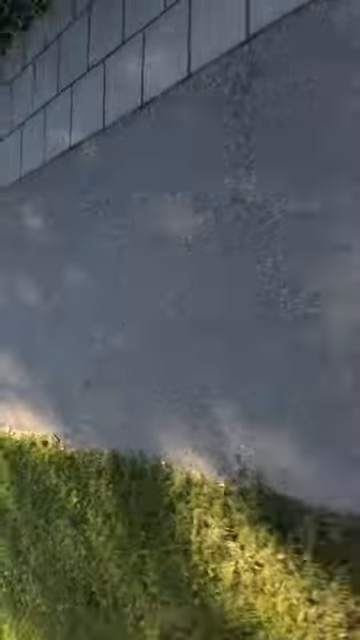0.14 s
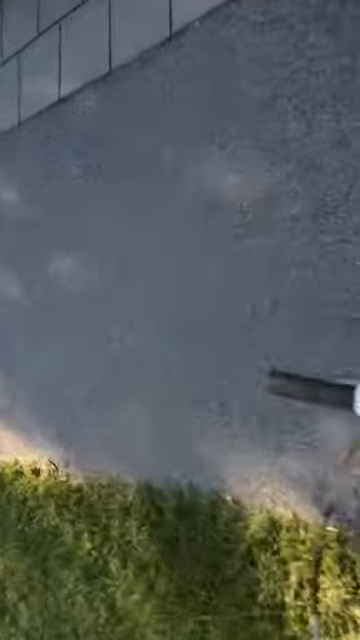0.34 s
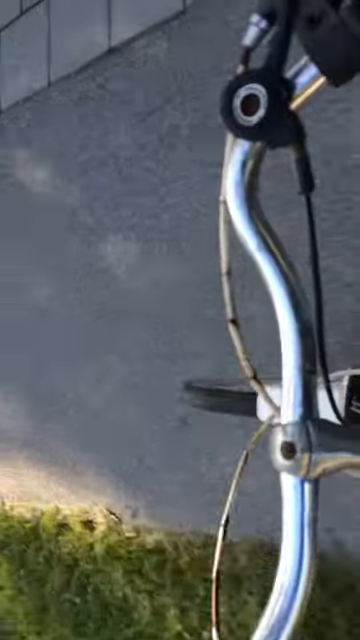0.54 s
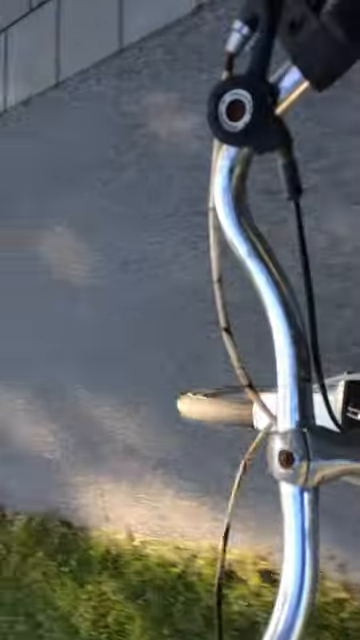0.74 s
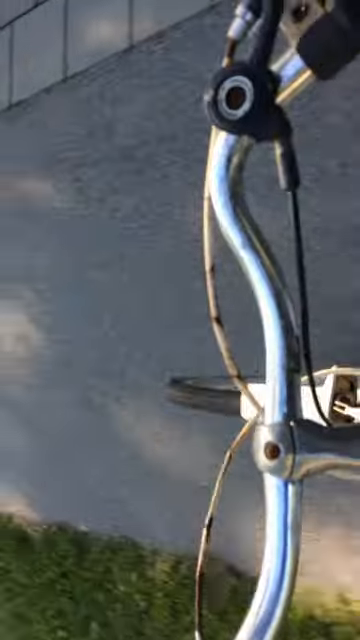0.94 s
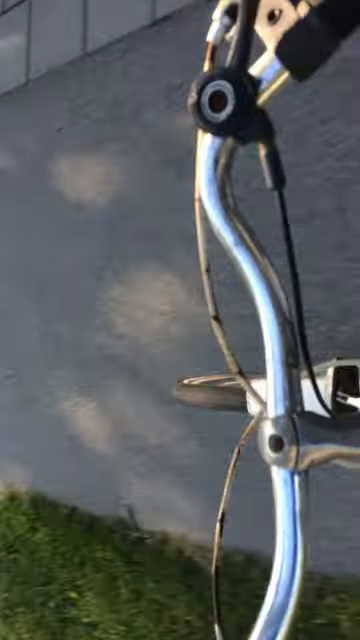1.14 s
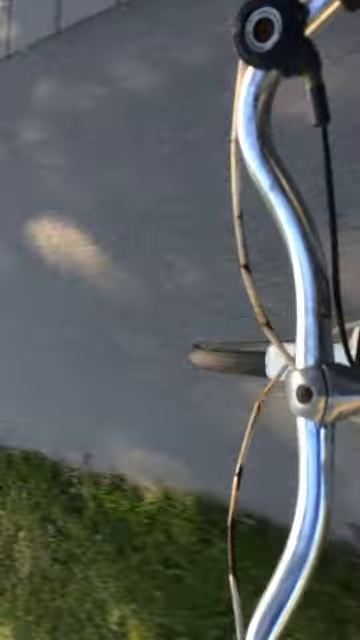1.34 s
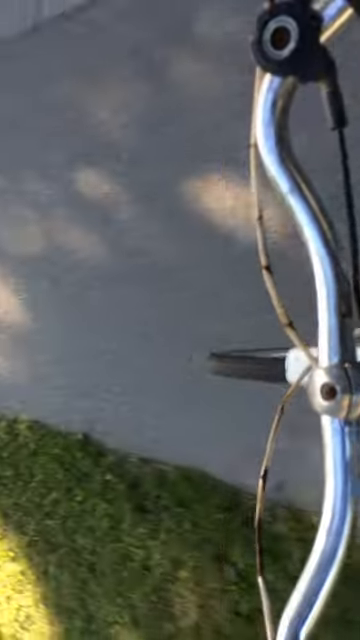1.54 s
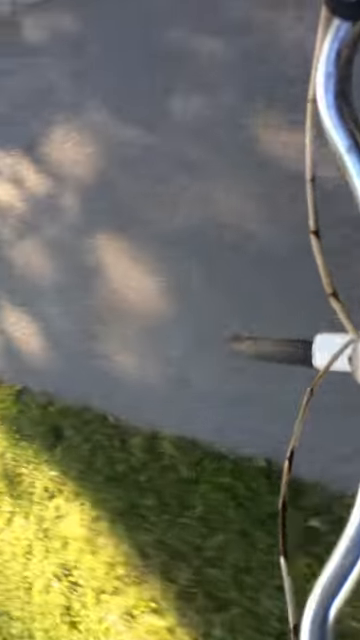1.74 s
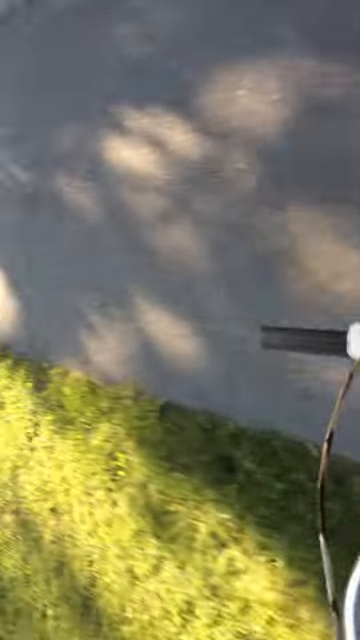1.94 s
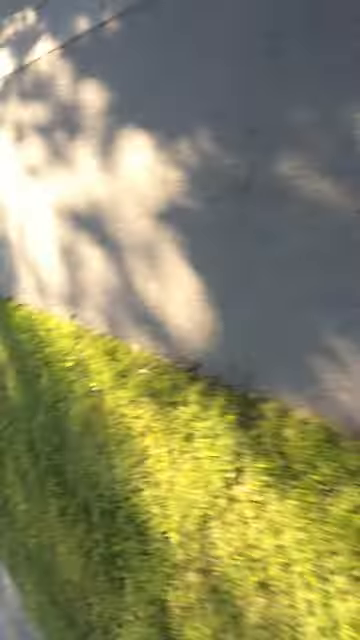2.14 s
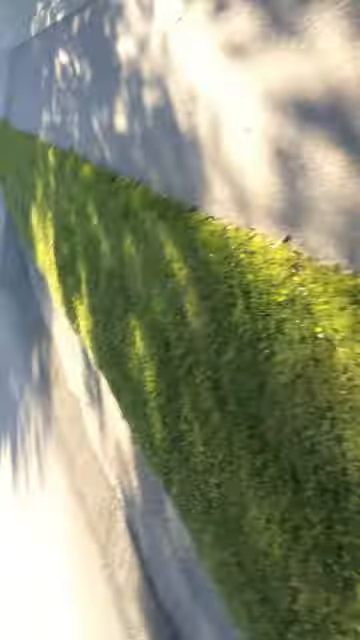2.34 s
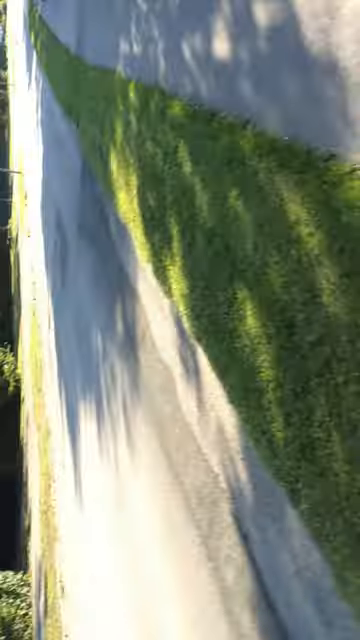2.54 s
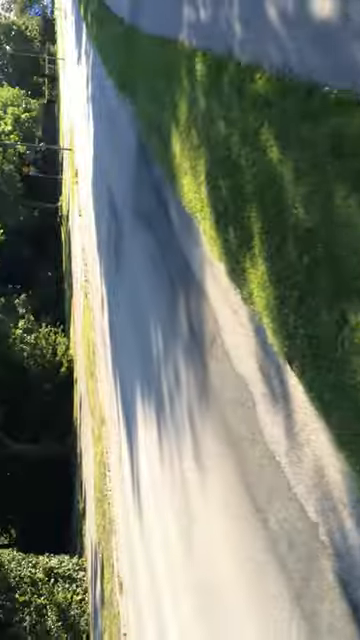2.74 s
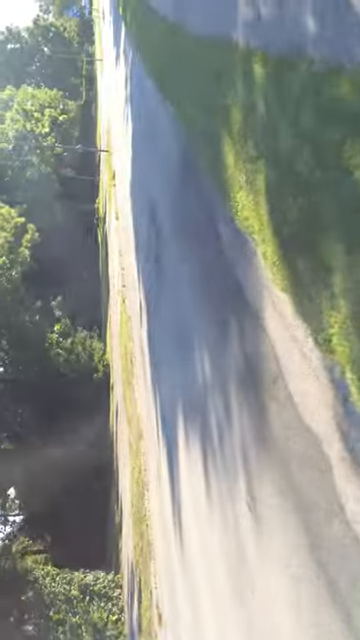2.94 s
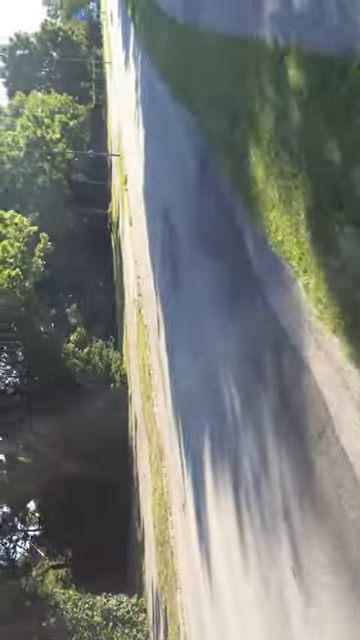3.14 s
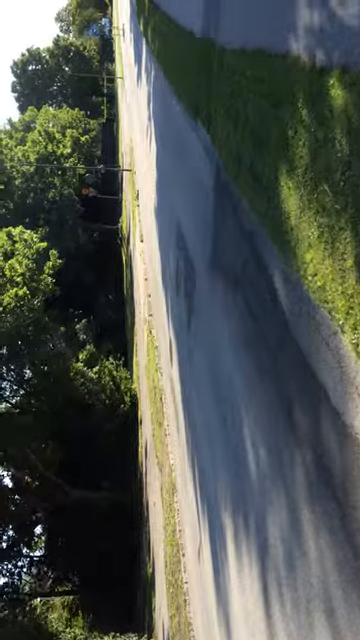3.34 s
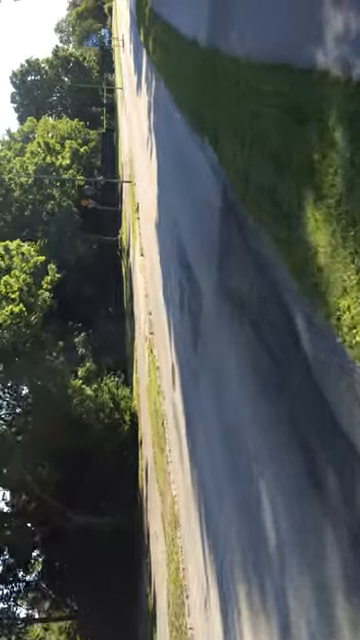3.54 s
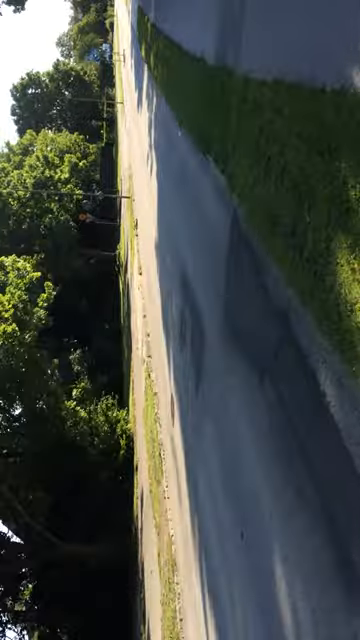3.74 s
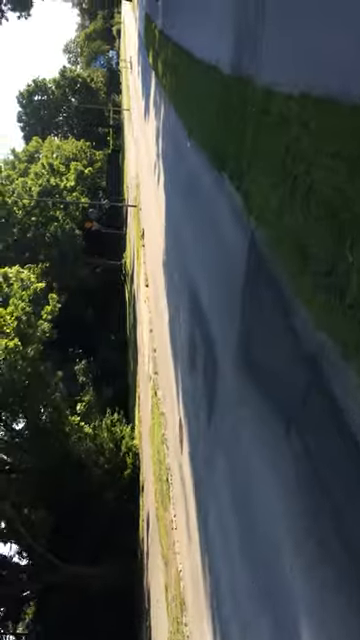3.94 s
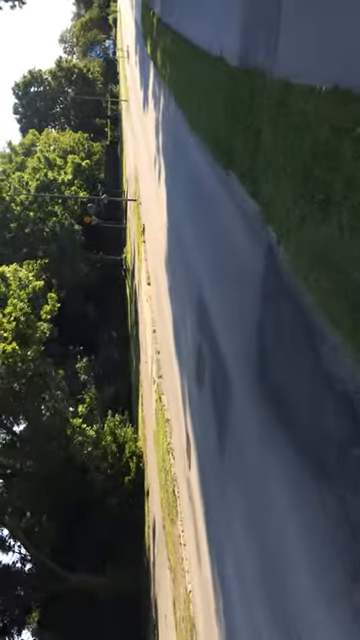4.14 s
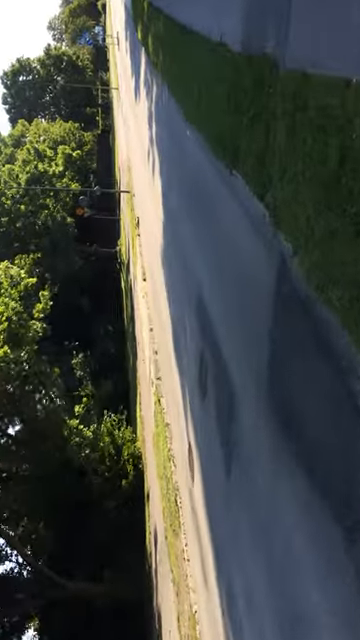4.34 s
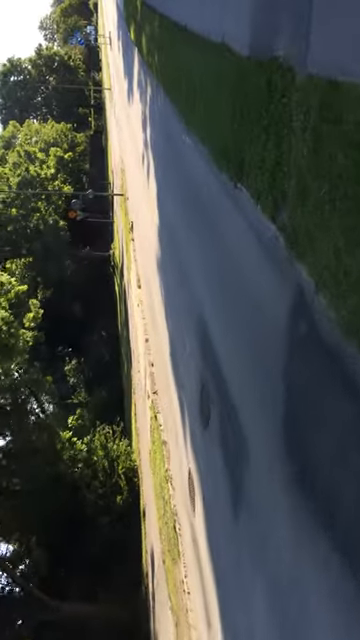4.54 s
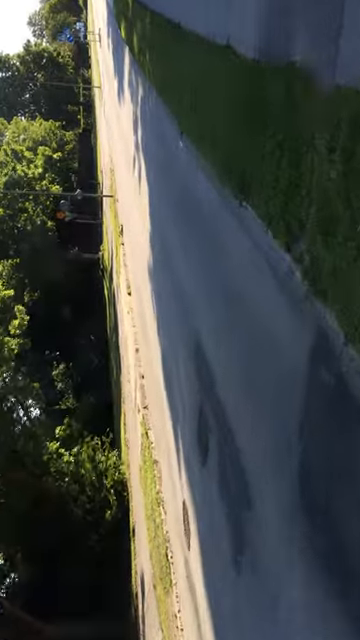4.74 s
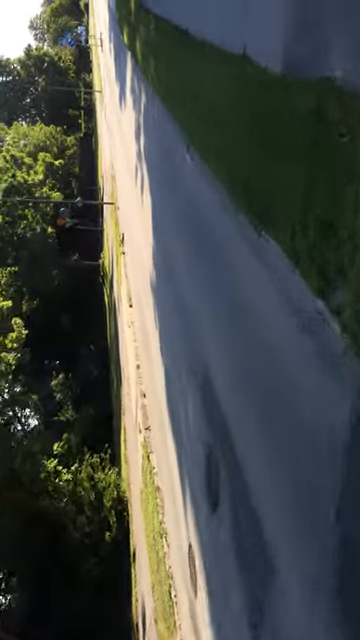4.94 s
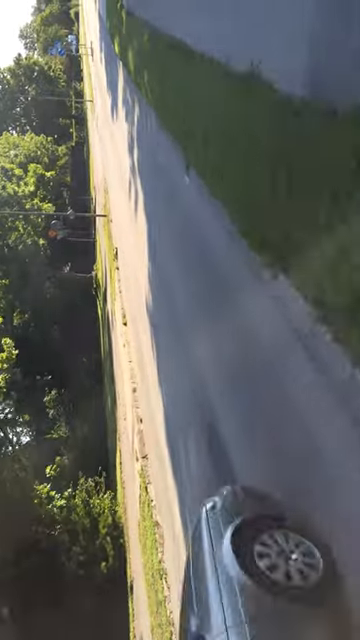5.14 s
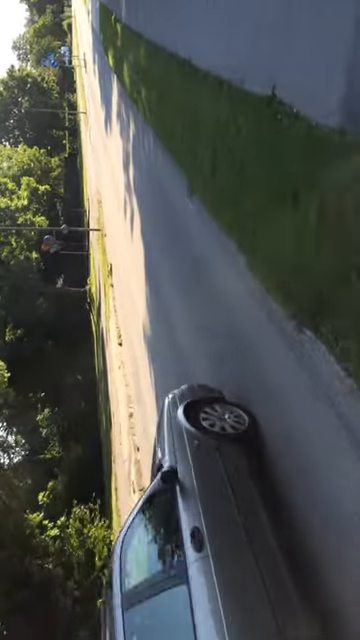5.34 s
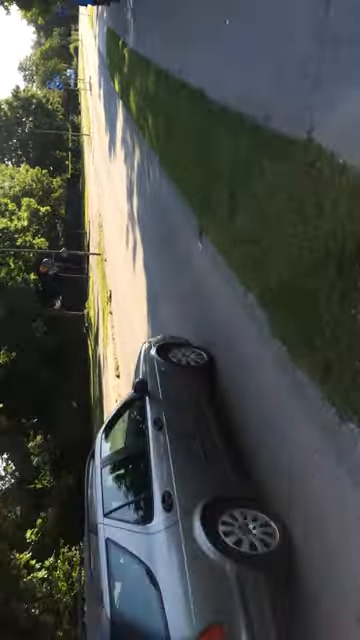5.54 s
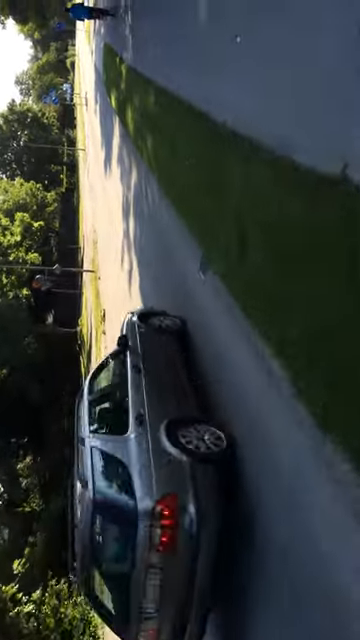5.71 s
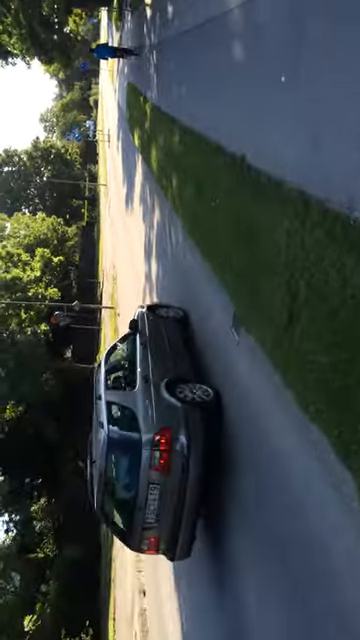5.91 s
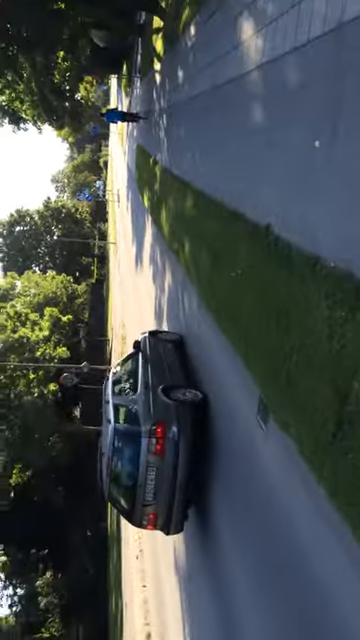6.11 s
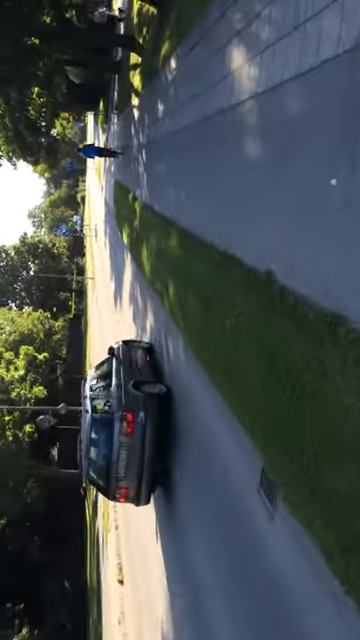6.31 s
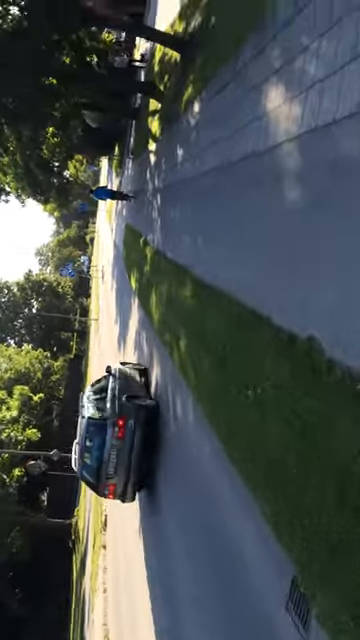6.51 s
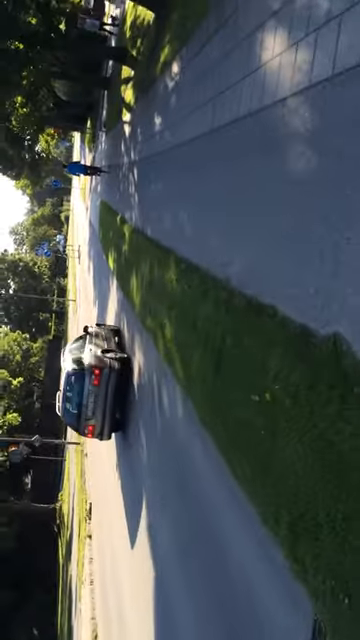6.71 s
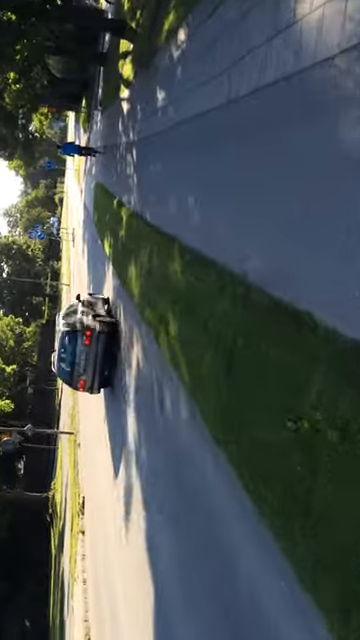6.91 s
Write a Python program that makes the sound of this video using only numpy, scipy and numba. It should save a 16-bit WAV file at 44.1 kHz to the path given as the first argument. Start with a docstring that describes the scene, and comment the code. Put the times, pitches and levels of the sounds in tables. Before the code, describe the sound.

Handheld on a moving bicycle: a metallic clank, soft rolling, one sharp loud snap, then a car roars past as loose metal rattles.

```python
"""A path beside a road: a car comes up from behind and overtakes a cyclist who holds a phone.
Car: shaped noise for tyre roar, hiss and body boom; a part tonal, part noisy hum for the exhaust.
Bicycle: rolling noise with tyre resonances, hissing bursts, a modal clank with rebounds, a rattle.
Hand: riding wind as low noise, dull thumps, light ticks and one loud snap of the phone's case."""
import sys
import numpy as np
from scipy import signal
from scipy.fft import rfft, irfft, next_fast_len
from scipy.io import wavfile
from scipy.ndimage import uniform_filter1d
from numba import njit

SR = 44100
rng = np.random.default_rng(int(sys.argv[2]) if len(sys.argv) > 2 else 0)


def unload_wav(signal):
    """Save mono or channel-first audio to the path in sys.argv[1] as 16-bit WAV at rate SR, clipped to [-1, 1]."""
    wavfile.write(
        sys.argv[1],
        SR,
        np.round(np.clip(np.atleast_2d(signal).T, -1, 1) * 32767).astype(np.int16),
    )


def invert_db(x):
    """Field ratio 10**(x/20) for x, a level in decibels (scalar or array-like)."""
    u = np.asarray(x, float) / 20
    return 10 ** u


N = 307377
T = np.arange(N) / SR  # s

# car: [t/s, tyre roar level/dB, tyre hiss level/dB, body boom level/dB]; roar and hiss before fade-in
CAR_LEVELS = [(1.6, -44, -62, -53), (2.2, -50.5, -62, -48), (2.7, -51, -59.5, -51),
              (3.3, -50.5, -62.5, -45), (3.7, -47, -59, -44), (4.03, -42.5, -57, -44),
              (4.24, -38, -56, -42), (4.46, -36.5, -54.5, -38.5), (4.65, -36.5, -49.5, -38),
              (4.88, -35.5, -43.5, -38), (5.2, -34.5, -46, -36), (5.4, -35.5, -46, -34.5),
              (5.65, -34.5, -47, -36.5), (5.9, -34.5, -47, -41.5), (6.07, -36.5, -50.5, -42.5),
              (6.36, -38, -53, -44.5), (6.6, -40, -53, -45.5), (6.97, -40.5, -56, -46)]
# relative noise spectra radiated ahead of and behind the car: [f/Hz, level/dB per Hz]
AHEAD_SPECTRUM = [(180, -5), (300, -13), (431, -3), (542, -5), (683, -1), (903, -2), (1140, -4),
                  (1720, -5.5), (2720, -16), (5800, -23.5), (8460, -18.5), (15300, -22)]
BEHIND_SPECTRUM = [(180, -42), (300, -32), (326, -61), (365, -5), (717, -6), (997, -2), (1320, -3),
                   (1500, -4), (1770, -5.5), (3660, -18), (4840, -20), (15300, -26)]
# passing of the car's front and back: [t/s, t/s]
TURN_S = (5.01, 5.86)
# exhaust hum, before wander: [t/s, f/Hz, level/dB]
EXHAUST_HUM = [(1.5, 146.3, -72), (1.8, 146, -53), (2.0, 150, -46), (2.15, 148, -54), (2.35, 140, -52),
               (2.7, 138, -53), (3.0, 141, -49), (3.12, 144, -46.5), (3.3, 146, -47), (3.5, 146, -43),
               (3.72, 148, -46), (3.85, 148, -60), (4.15, 147, -44.5), (4.3, 146, -46), (4.46, 162.7, -41),
               (4.6, 172, -43.5), (5.0, 178.8, -44), (5.35, 177, -53), (5.56, 177.6, -41),
               (5.77, 170, -36.5), (5.95, 170, -45.5), (6.3, 168.6, -53), (6.45, 165, -62),
               (6.6, 174.2, -49.5), (6.97, 175.4, -52)]
# car's top treble: [t/s, level/dB]
RUSH_LEVEL = [(4.45, -84), (4.65, -62.5), (4.85, -59.5), (5.3, -54.5), (5.9, -55.5), (6.1, -59), (6.4, -66),
              (6.97, -74)]
# roar colour as the car turns its sides, before wander:
# [t/s, drone level/dB over roar, tread ring level/dB over roar, tread ring f/Hz]
ROAR_SHADES = [(1.6, -12, -0.5, 906), (3.3, -8, 1.5, 904), (4.0, -13, -3, 920), (4.3, -13, -12, 950),
               (4.6, -3, -9, 950), (5.05, -6, -13, 930), (5.17, -11, -2.5, 1010), (5.4, -5, -1.5, 960),
               (5.57, -6.5, 2.5, 995), (5.75, -8, -3.5, 1115), (5.92, -8.5, -0.5, 1040),
               (6.1, -12, -1.5, 1000), (6.3, -12, -6, 1050), (6.97, -17.5, -9, 1040)]
# narrow surges of the roar: [t/s, length/s, peak level/dB, start f/Hz, fall/octaves per s]
ROAR_SURGES = [(4.36, .05, -29, 920, 0.3), (4.43, .05, -31, 670, 0.3), (4.535, .05, -29, 970, 0.3),
               (4.655, .06, -27, 960, 1.2), (4.8, .05, -31, 960, 0.3), (4.93, .1, -29, 850, 1.2),
               (5.01, .075, -29, 590, 0.8), (5.075, .05, -33, 630, 0.3)]
# relative bicycle rolling spectrum: [f/Hz, level/dB per Hz]
ROLL_SPECTRUM = [(59, -41), (100, -8), (152, 0), (312, -8.5), (369, -10), (485, -10.5), (539, -13.5),
                 (803, -12.5), (951, -11), (1300, -16.5), (1540, -12.5), (3730, -24.5), (6590, -23.5),
                 (13800, -30.5), (15300, -35)]
# bicycle tyre hum: [t/s, level/dB]
TYRE_HUM_LEVEL = [(0.0, -50.5), (0.85, -48), (1.8, -48.5), (2.01, -47.5), (2.7, -53)]
# air column and casing of the bicycle tyres, before wander:
# [f/Hz, width/Hz, level/dB over the low rolling noise, level slope/dB per s]
TYRE_RESONANCES = [(922, 45, -12, 0.5), (1540, 280, -12.5, -2.5)]
# chain and spoke hiss: [t/s, peak level/dB, fall time on either side/s]
HISS_BURSTS = [(.26, -51.5, 0.034), (.384, -66, 0.044), (.5, -67, 0.072), (.65, -63, 0.14),
               (.82, -60.5, 0.058), (.956, -59, 0.027), (1.056, -65, 0.046), (1.192, -62, 0.034),
               (1.338, -55.5, 0.058), (1.548, -61.5, 0.082), (1.59, -75, 0.036), (1.75, -64, 0.068),
               (1.884, -56.5, 0.026), (2.03, -60.5, .08), (2.16, -64, .04), (2.21, -69, 0.032),
               (2.33, -64, 0.03), (2.42, -61, 0.052), (2.57, -69, 0.046), (2.7, -66, 0.018),
               (2.96, -66, .05), (3.18, -67, .02), (3.4, -68, .04), (3.56, -63, .04)]
# hiss bed under the bursts: [t/s, level/dB]
HISS_BED = [(0, -72), (2.7, -72), (3.6, -69.5), (4.3, -63.5)]
# thin metal parts that sing faintly: [t/s, length/s, f/Hz, peak level/dB]
SINGING_PARTS = [(0.165, 0.04, 6420, -57), (.55, .16, 5050, -59), (.57, .19, 4130, -60),
                 (.6, .09, 11200, -63), (0.692, 0.095, 6350, -56), (0.784, .09, 4130, -60),
                 (1.14, 0.11, 4130, -59), (1.17, .06, 7400, -60), (1.312, .07, 5050, -58),
                 (1.36, .1, 4130, -59), (1.56, .05, 9300, -63), (1.72, .14, 8480, -60),
                 (1.833, 0.13, 6600, -52)]
# frame clank and rebounds:
# [t/s, peak level/dB of the blow, ring and clatter together, contact/s, clatter level/dB over ring]
CLANK_BLOWS = [(0.072, -22.5, 0.003, -1.5), (.086, -32, .002, -14), (.097, -35, .002, -10)]
# clanking parts come to rest on each other: [t/s, ring level change/dB]
CLANK_REST = (.104, -5)
# frame modes, and bands of modes too dense to tell apart: [f/Hz, level/dB, t60/s]
FRAME_MODES = [(634, -10, .1), (900, -18, 0.12), (1156, -5.5, 0.08), (1840, -5, 0.089), (2340, -6.5, 0.29),
               (2515, -2, .1), (2617, -0.5, 0.22), (2700, -7.5, 0.21), (2850, -10, .1), (2945, -13, 0.26),
               (3750, -7, 0.056), (4650, -9, 0.058), (5930, -14, 0.04), (6130, -6, 0.05), (7030, -7, 0.049),
               (12700, -18, .04)]
FRAME_BANDS = [(600, -5, 0.14), (1550, -2, 0.091), (2540, 2.5, 0.06), (4550, 0, 0.059), (6600, -1, 0.084),
               (11000, -14, 0.048)]
# loose metal blows: [t/s, peak level/dB, low modes level/dB added, shake/s, clatter level/dB over ring]
RATTLE_BLOWS = [(5.516, -26, 7, 0.021, -3), (5.536, -22.5, -12, 0.021, -2.5), (5.555, -22, -5, 0.024, -2),
                (5.692, -27.5, -4, 0.013, -4), (5.738, -18.5, 7, 0.014, -9), (5.7672, -19.5, -3, 0.015, -5),
                (5.816, -30, 0, 0.013, -5), (5.845, -22.5, -8, 0.018, -1), (5.891, -20, 1, 0.017, -7),
                (5.92, -22.5, -0.5, 0.022, -6), (5.9698, -28, -8, 0.013, 3), (5.992, -29, -2, 0.016, -1)]
# loose metal modes and dense bands: [f/Hz, level/dB, t60/s]
RATTLE_MODES = [(2300, -1, .02), (3180, -7, 0.011), (3240, 0.5, 0.037), (3400, 2.5, 0.042),
                (3760, 2, 0.017), (4120, 0, 0.015), (4300, -12, 0.015), (5600, -11, 0.015),
                (6150, -1, 0.012), (6350, -4, 0.058), (6450, 4.5, 0.022), (6770, -6, 0.016),
                (7650, -3.5, 0.018), (8900, -7, 0.024), (10120, -24, .015), (11700, -13, .015)]
RATTLE_BANDS = [(3420, 6.5, 0.2), (5300, 2, 0.091), (7400, -12, 0.049), (12700, -26, 0.037)]
# dull wind bumps on the microphone: [t/s, peak level/dB, f/Hz]
WIND_THUMPS = [(0.685, -33.5, 76.7), (3.49, -36, 78), (3.644, -41, 62), (4.897, -34, 73), (5.272, -31, 70),
               (5.415, -32, 68), (5.619, -41, 73)]
# case ticks and snap: [t/s, peak level/dB, ringing share 0-1]
CASE_TICKS = [(0.2155, -37, .9), (.2423, -41, .2), (.9515, -40, 0.1), (1.3293, -45, .2),
              (1.8841, -42, 0.23), (1.9523, -32, 0.9), (1.9584, -8, 0.73), (1.959, -20.5, 0.44),
              (1.967, -34, 0.1), (3.1787, -30, 0.2)]
# case modes and dense bands: [f/Hz, level/dB, t60/s]
CASE_MODES = [(420, -8, .006), (1210, -2, .01), (2120, 5, 0.008), (2970, 0, 0.011), (3650, 6, 0.009),
              (4330, 0, 0.013), (5330, -8, 0.004)]
CASE_BANDS = [(1530, -5, 0.066), (3460, 1.5, 0.1), (7000, -4, 0.043), (12500, -9, 0.14)]
# riding wind, before buffets: [t/s, level/dB]
WIND_LEVEL = [(0, -50), (.25, -60.5), (.7, -46.5), (.95, -58), (1.15, -48), (1.4, -56.5), (1.6, -52),
              (1.8, -59), (2.25, -47), (2.6, -49.5), (2.9, -44.5), (3.35, -58), (3.68, -43), (3.95, -50.5),
              (4.4, -49), (4.6, -50), (4.72, -41), (5.3, -44.5), (5.63, -43), (5.95, -55), (6.1, -50),
              (6.97, -49)]


def car():
    """Tyre noise turns from the ahead to the behind spectrum; drone, tread ring, boom and hum join it."""
    roar_db, hiss_db, boom_db = curves(CAR_LEVELS)
    rush_db, = curves(RUSH_LEVEL)
    back = np.clip((T - TURN_S[0]) / (TURN_S[1] - TURN_S[0]), 0, 1)
    ahead = coloured(AHEAD_SPECTRUM, 0.91, 9)
    behind = coloured(BEHIND_SPECTRUM, 0.29, 9.8)
    noise = np.sqrt(1 - back) * ahead + np.sqrt(back) * behind
    body, hiss = split(noise, 2660)
    stones_db = 0.95 * uneven_contacts(60) + 1.3 * walk(30) + 1.24 * walk(8)
    hiss = split(hiss * invert_db(stones_db), 1640)[1]
    hiss, rush = split(hiss, 6200)
    tyres = invert_db(roar_db) * tyre_roar(body) + invert_db(hiss_db) * unit(hiss)
    fade_in = np.clip((T - 1.6) / 1.64, 0, 1)  # grows out of the distance
    boom = coloured([(90, -17), (130, 0.5), (200, 1), (300, -2.5), (400, -16.0)], 1.0, 13)
    return fade_in * tyres + invert_db(rush_db) * unit(rush) + exhaust() + invert_db(boom_db) * boom


def tyre_roar(body):
    """Rough road drives the tread in surges; the hollow under the floor favours one wandering pitch."""
    drone_db, ring_db, ring_hz = curves(ROAR_SHADES)
    drone_hz = 536 * (1 + 0.03 * walk(7.7))
    drone_db = drone_db + 1.5 * walk(6.9)
    ring_hz = ring_hz * (1 + 0.03 * walk(7))
    ring_db = ring_db + 0.9 * walk(7)
    drone, roar = split(body, 596)
    drone = unit(drone) + 0.32 * unit(svf(drone, drone_hz, 78.0))
    tread = svf(svf(rng.standard_normal(N), ring_hz, 290.0), ring_hz, 290.0)
    tread = unit(tread) * invert_db(1.9 * walk(25))
    return unit(roar) + invert_db(ring_db) * tread + invert_db(drone_db) * unit(drone)


def exhaust():
    """Hum: a sine and narrow noise on the same wandering pitch."""
    hum_hz, hum_db = curves(EXHAUST_HUM)
    hum_hz = hum_hz * (1 + .022 * walk(12))
    tone = np.sqrt(2) * np.sin(2 * np.pi * np.cumsum(hum_hz) / SR)
    rough = unit(svf(rng.standard_normal(N), hum_hz, 13.6))
    tone_share = 0.46  # of the power
    hum = np.sqrt(tone_share) * tone + np.sqrt(1 - tone_share) * rough
    return hum * invert_db(hum_db + 2.3 * walk(11))


def whoosh():
    """Bands of tyre and air noise that swell for a moment and sag in pitch."""
    out = np.zeros(N)
    width_hz = 90.
    for start_s, length_s, db, hz, fall in ROAR_SURGES:
        t = np.arange(int(length_s * SR)) / SR
        centre_hz = hz * 2 ** (-fall * t)
        band = svf(rng.standard_normal(len(t)), centre_hz, width_hz)
        band = svf(band, centre_hz, width_hz)
        add(out, start_s, db, np.sin(np.pi * t / length_s) * band)
    return out


def bicycle():
    """Everything the bicycle radiates."""
    return rolling() + chain_hiss() + singing() + clank() + rattle()


def rolling():
    """Tyre hum on the asphalt with wandering air-column and casing resonances, plus a steady hiss."""
    hum_db, = curves(TYRE_HUM_LEVEL)
    low, high = split(coloured(ROLL_SPECTRUM, 0.73, 10), 4300)
    low = unit(low)
    for hz, width_hz, db, slope in TYRE_RESONANCES:
        level_db = db + slope * T + 3 * walk(7.3)
        centre_hz = hz * (1 + 0.027 * walk(3.85))
        low = low + invert_db(level_db) * unit(svf(rng.standard_normal(N), centre_hz, 1. * width_hz))
    return invert_db(hum_db) * low + invert_db(-65) * unit(high)


def chain_hiss():
    """Chain and spokes: gritty rustle in bursts; it shakes the loose metal a little and tinkles."""
    level = invert_db(curves(HISS_BED)[0])
    for peak_s, db, fall_s in HISS_BURSTS:
        level = level + invert_db(db) * np.exp(-abs(T - peak_s) / fall_s)
    grit = invert_db(2.1 * uneven_contacts(40))
    rustle = split(grit * coloured(ROLL_SPECTRUM, 4.3, 60), 2940)[1]
    jingle = sum(invert_db(db) * svf(rustle, np.full(N, 1. * hz), 60.)
                 for hz, db, _ in RATTLE_MODES if hz > 5000)
    jingle = 0.042 * invert_db(4.9 * walk(12)) * unit(jingle)
    return level * (unit(rustle) + jingle + 0.36 * tinkle(count=900))


def tinkle(count):
    """Chain links and spokes touching: tiny pings at chance pitches."""
    out = np.zeros(N)
    t = np.arange(int(.04 * SR)) / SR
    envelope = np.minimum(t / 0.0028, 1) * np.exp(-t / 0.0058)
    for when, pitch, size in rng.random((count, 3)):
        hz = 3800 * 3.6 ** pitch
        add(out, when * N / SR, -14 * size, np.sin(2 * np.pi * hz * t) * envelope)
    return unit(out)


def singing():
    """Each part is rubbed by noise: a ragged narrow tone that swells and fades."""
    out = np.zeros(N)
    for start_s, length_s, hz, db in SINGING_PARTS:
        t = np.arange(int(length_s * SR)) / SR
        tone = svf(rng.standard_normal(len(t)), np.full(len(t), 1. * hz), 45.)
        add(out, start_s, db, tone * np.sqrt(np.sin(np.pi * t / length_s)))
    return out


def clank():
    """Frame modes struck through brief contacts; the ring drops as the parts come to rest."""
    out = np.zeros(N)
    rest_s, rest_db = CLANK_REST
    for start_s, db, contact_s, clatter_db in CLANK_BLOWS:
        rings = ring(FRAME_MODES)
        t = np.arange(len(rings)) / SR
        rings *= np.minimum(t / contact_s, 1)
        rings *= invert_db(rest_db * np.clip((start_s + t - rest_s) / .003, 0, 1))
        dense = unit(clatter(FRAME_BANDS, width=0.66))
        add(out, start_s, db, unit(rings) + invert_db(clatter_db) * dense)
    return out


def rattle():
    """Loose metal hits and skips over a bump: slightly detuned modes and shaken dense bands."""
    out = np.zeros(N)
    for start_s, db, low_db, shake_s, clatter_db in RATTLE_BLOWS:
        modes = [(hz * (1 + 0.0053 * rng.standard_normal()), level_db + low_db * (hz < 5000), t60)
                 for hz, level_db, t60 in RATTLE_MODES]
        rings = signal.fftconvolve(chatter(shake_s), ring(modes, .1))[:int(.1 * SR)]
        t = np.arange(len(rings)) / SR
        shaken = np.minimum(t / 0.00091, 1) * (.1 + np.exp(-(t / shake_s) ** 3))
        shaken = shaken * invert_db(1.7 * rng.standard_normal(len(t)))
        dense = unit(shaken * clatter(RATTLE_BANDS, .1, width=1.03))
        add(out, start_s, db, unit(rings) + invert_db(clatter_db) * dense)
    return out


def case_ticks():
    """N-shaped cracks: sudden push, swing to suction, release; then case modes ring."""
    out = np.zeros(N)
    t = np.arange(int(.1 * SR)) / SR
    for start_s, db, ringing in CASE_TICKS:
        half_s = .0001 * (0.34 + 0.52 * ringing)  # less ringing, shorter crack
        crack = (.65 - t / half_s) * np.exp(-(t / (2.5 * half_s)) ** 6)
        crack = crack + 1.13 * np.exp(-t / 1.5e-5)
        rings = ringing * 0.23 * ring(CASE_MODES, .1)
        add(out, start_s, db, crack + rings + 0.054 * clatter(CASE_BANDS, .1, width=0.82))
    return out


def thumps():
    """Dull damped sines: gusts of wind bump against the microphone."""
    out = np.zeros(N)
    t = np.arange(int(.1 * SR)) / SR
    for start_s, db, hz in WIND_THUMPS:
        add(out, start_s, db, np.sin(2 * np.pi * hz * t) * t * np.exp(-t / 0.012))
    return out


def wind():
    """Riding wind on the microphone: low rumble in short buffets."""
    wind_db, = curves(WIND_LEVEL)
    rumble = coloured([(22, -21), (40, -12.5), (60, 0.0), (80, -5.5), (120, -6.0)], 2.5, 16)
    return invert_db(wind_db + 1.7 * walk(12)) * rumble


def curves(table):
    """Columns of a table interpolated along time."""
    s, *columns = np.transpose(table)
    return [np.interp(T, s, c) for c in columns]


def unit(x):
    """Rms 1."""
    return x / np.sqrt(np.mean(x ** 2))


def walk(rate):
    """Random values held 1 / rate s and slewed twice; rms near 0.7."""
    k = int(SR / rate)
    steps = np.repeat(rng.standard_normal(N // k + 1), k)
    return 0.96 * uniform_filter1d(uniform_filter1d(steps, k), k)[:N]


def uneven_contacts(hold):
    """Tiny contacts of uneven strength, each held for a number of samples."""
    return np.repeat(np.minimum(rng.exponential(1, N // hold + 1), 4.5), hold)[:N]


def coloured(points, flicker_db, rate):
    """Noise of a given spectrum whose octaves flicker each on their own."""
    size = next_fast_len(N)
    octave = np.log2(np.maximum(np.arange(size // 2 + 1) * SR / size, 1))
    hz, db = np.transpose(points)
    shape = invert_db(np.interp(octave, np.log2(hz), db, left=-99, right=-99))
    spectrum = rfft(rng.standard_normal(size)) * shape
    out = np.zeros(N)
    for centre in range(int(np.log2(hz[0])), int(np.log2(hz[-1])) + 2):
        weight = np.clip(1 - abs(octave - centre), 0, 1)
        out += irfft(spectrum * weight, size)[:N] * invert_db(flicker_db * walk(rate))
    return unit(out)


@njit
def svf(x, hz, width):
    """State-variable band-pass with a moving centre, gain 1 there."""
    y, b, l = np.empty(len(x)), 0., 0.
    for i in range(len(x)):
        g, k = np.tan(np.pi * hz[i] / SR), width / hz[i]
        v = (b + g * (x[i] - l)) / (1 + g * (g + k))
        b, l, y[i] = 2 * v - b, l + 2 * g * v, k * v
    return y


def split(x, hz):
    """Below and above a frequency."""
    low = signal.sosfiltfilt(signal.butter(2, hz, fs=SR, output="sos"), x)
    return low, x - low


def ring(modes, length=.4):
    """One blow on a set of decaying modes, each taken a little differently."""
    t = np.arange(int(length * SR)) / SR
    touch = invert_db(1.2 * rng.standard_normal(len(modes)))
    return sum(a * invert_db(db - 60 * t / t60) * np.sin(2 * np.pi * hz * t)
               for a, (hz, db, t60) in zip(touch, modes))


def chatter(length):
    """A contact hits and then skips: one blow, then dense uneven micro-impacts dying away."""
    t = np.arange(int(.08 * SR)) / SR
    skips = rng.standard_normal(len(t)) * invert_db(1.5 * rng.exponential(1, len(t)))
    return skips * np.exp(-(t / length) ** 2) + invert_db(16.5) * np.exp(-t / 3e-5)


def clatter(bands, length=.4, width=.6):
    """Modes too dense to tell apart: wide noise bands, each with its own decay."""
    t = np.arange(int(length * SR)) / SR
    out = np.zeros(len(t))
    for hz, db, t60 in bands:
        centre_hz = np.full(len(t), 1. * hz)
        band = svf(rng.standard_normal(len(t)), centre_hz, width * hz)
        band = svf(band, centre_hz, width * hz)
        out += invert_db(db - 60 * t / t60) * unit(band)
    return out


def add(out, s, db, sound):
    """Lay a sound at a time with a peak level."""
    i = int(s * SR)
    piece = sound[:N - i]
    out[i:i + len(piece)] += invert_db(db) * piece / np.max(np.abs(sound))


def scene():
    """All sources at one microphone."""
    return (car() + whoosh() + bicycle() + case_ticks() + thumps() + wind())[None]


def top_cut(x):
    """Nothing passes above the cut-off."""
    return signal.sosfilt(signal.butter(12, 16510, fs=SR, output="sos"), x)


def record(dry):
    """The phone cuts the top with a steep low-pass."""
    low_pass = signal.ellip(10, .2, 45, 15300, fs=SR, output="sos")
    mix = signal.sosfilt(low_pass, dry)
    return top_cut(mix)


dry = scene()
out = record(dry)
unload_wav(out)
```